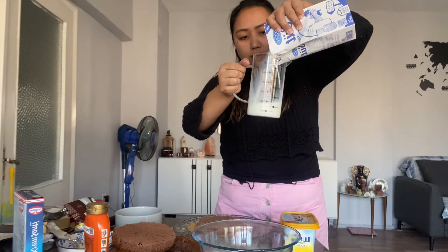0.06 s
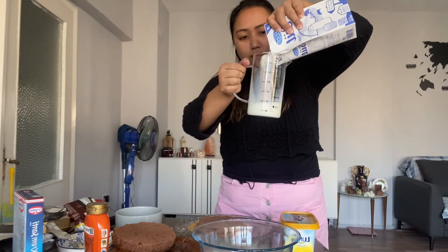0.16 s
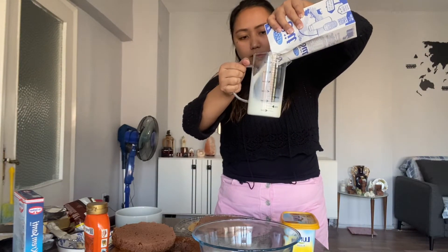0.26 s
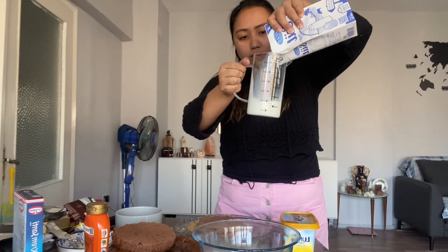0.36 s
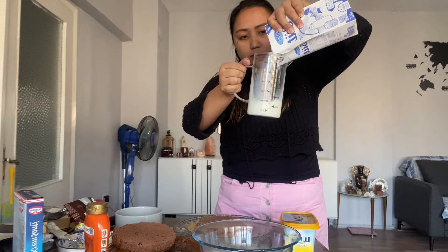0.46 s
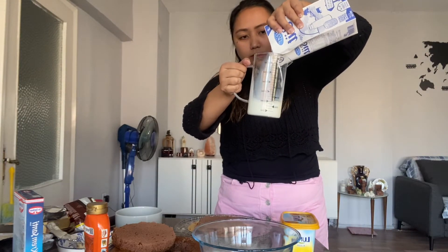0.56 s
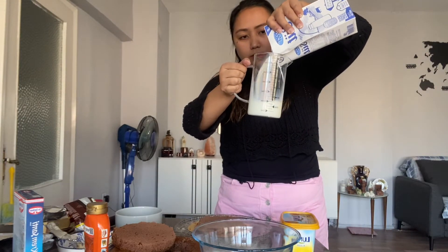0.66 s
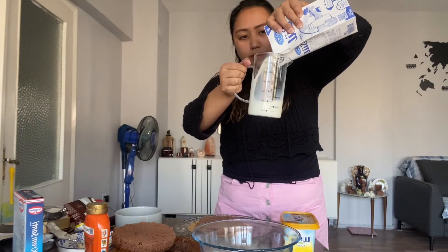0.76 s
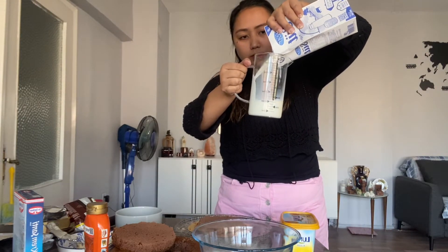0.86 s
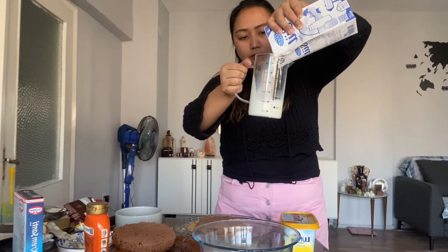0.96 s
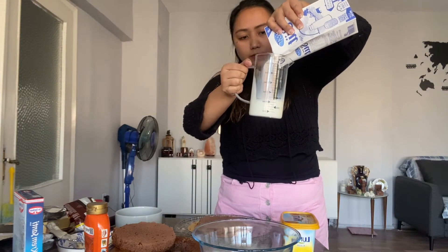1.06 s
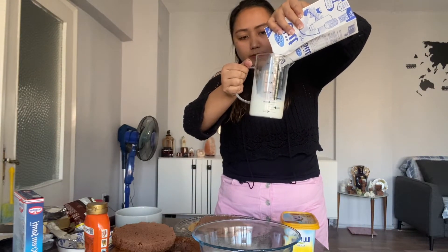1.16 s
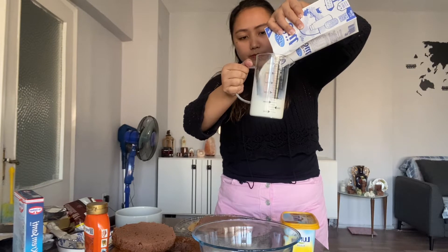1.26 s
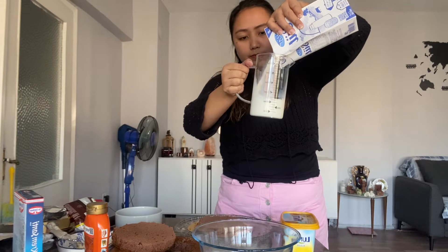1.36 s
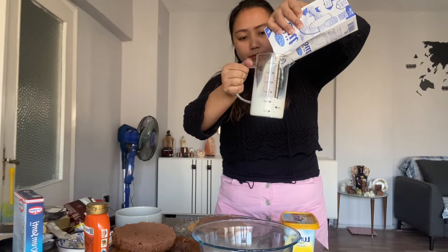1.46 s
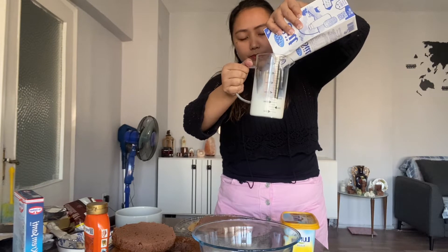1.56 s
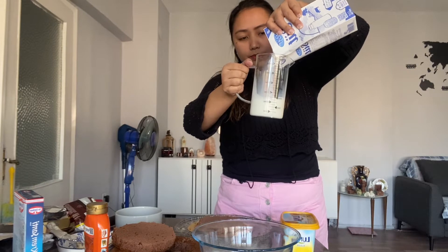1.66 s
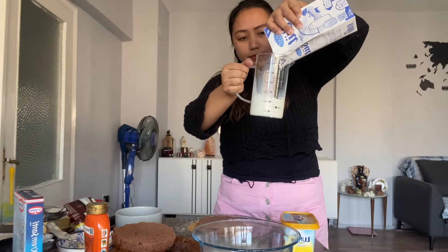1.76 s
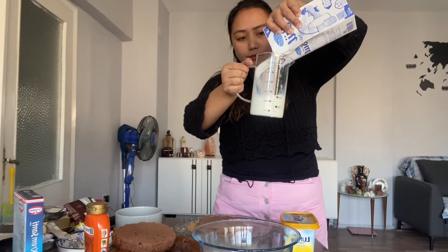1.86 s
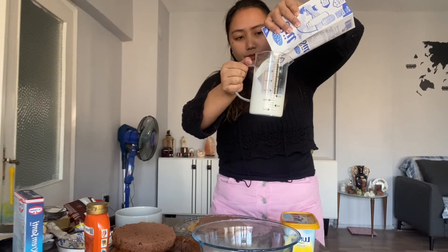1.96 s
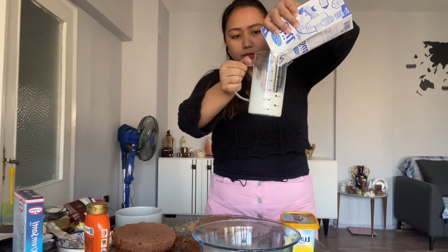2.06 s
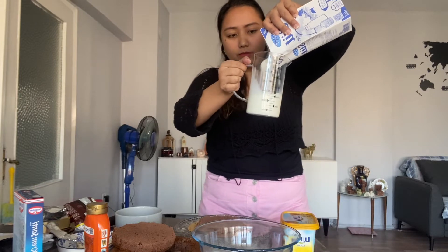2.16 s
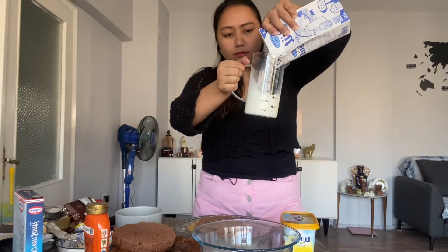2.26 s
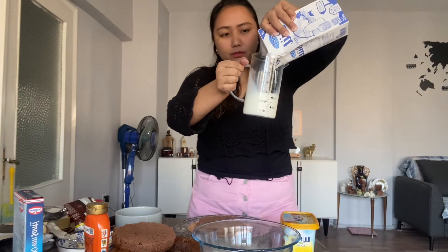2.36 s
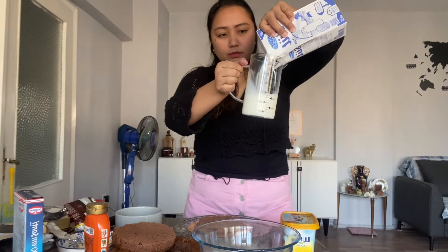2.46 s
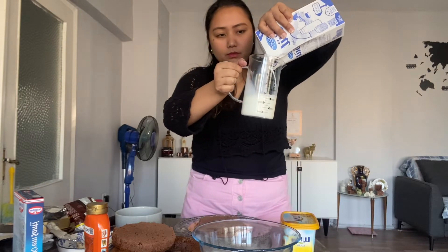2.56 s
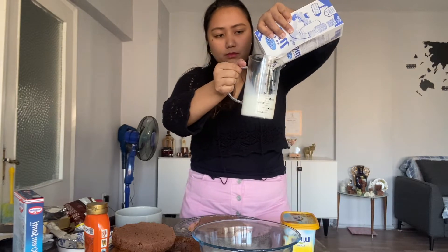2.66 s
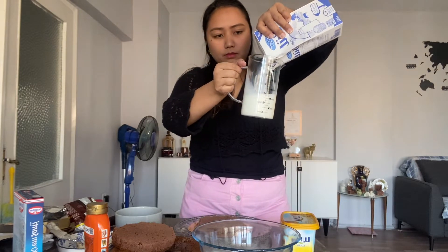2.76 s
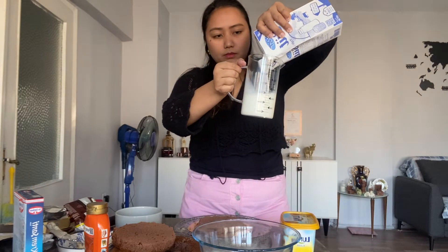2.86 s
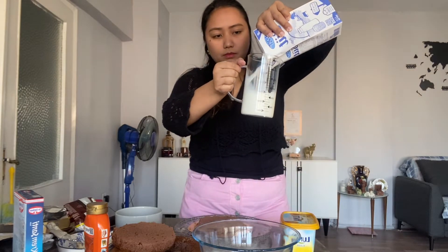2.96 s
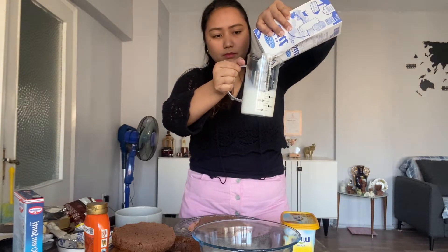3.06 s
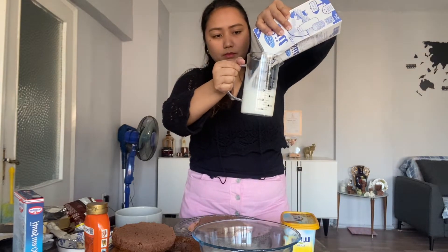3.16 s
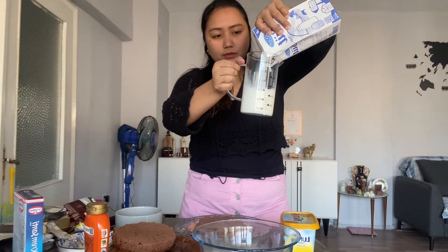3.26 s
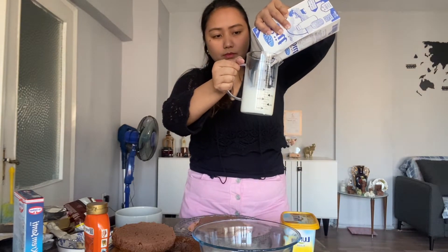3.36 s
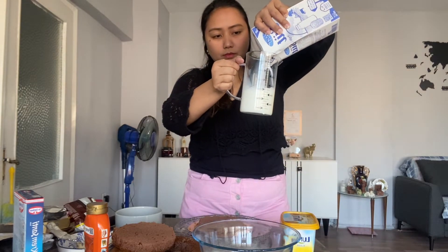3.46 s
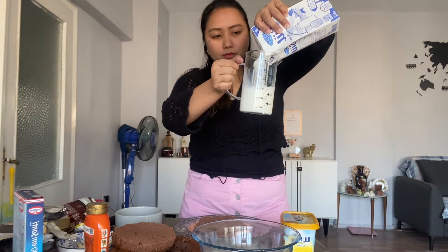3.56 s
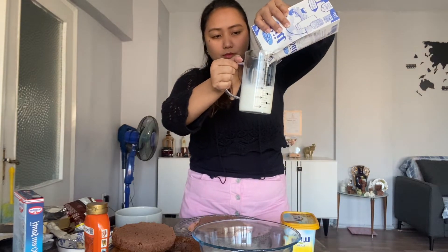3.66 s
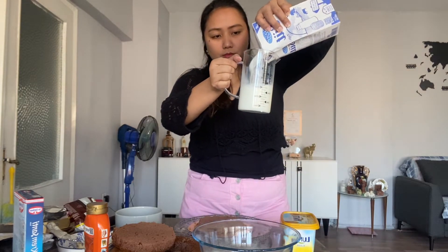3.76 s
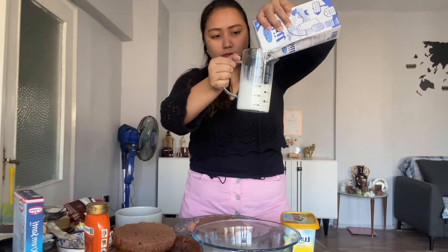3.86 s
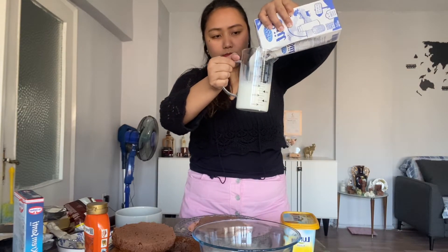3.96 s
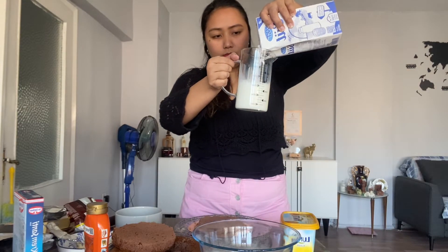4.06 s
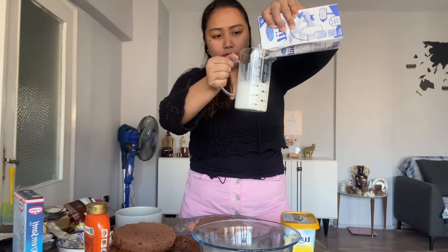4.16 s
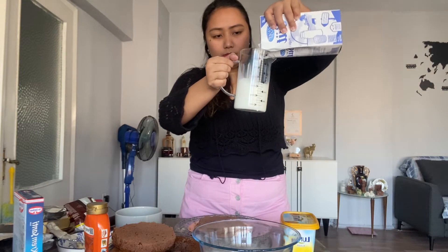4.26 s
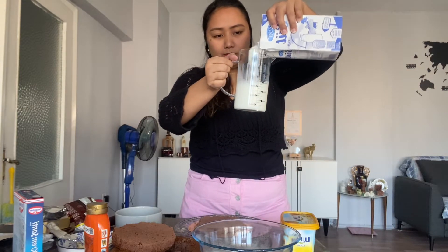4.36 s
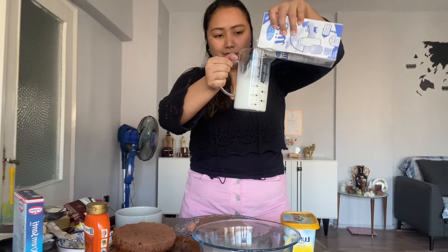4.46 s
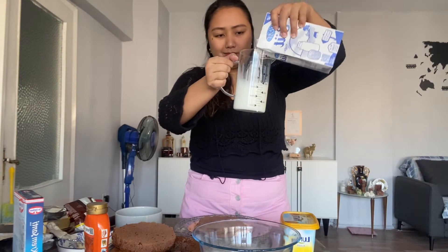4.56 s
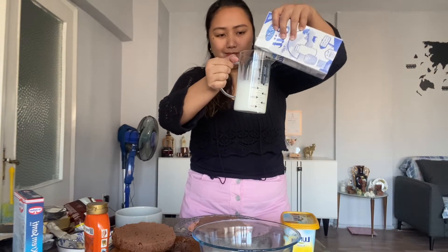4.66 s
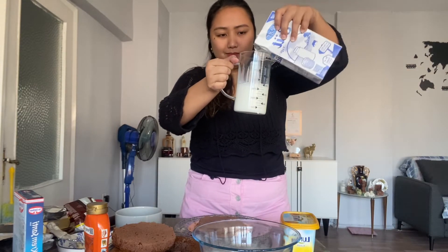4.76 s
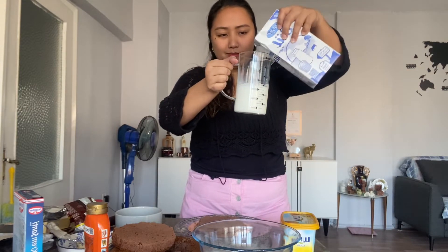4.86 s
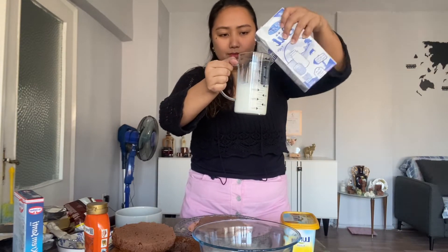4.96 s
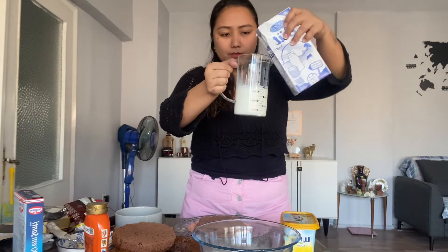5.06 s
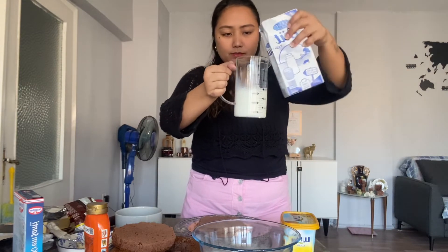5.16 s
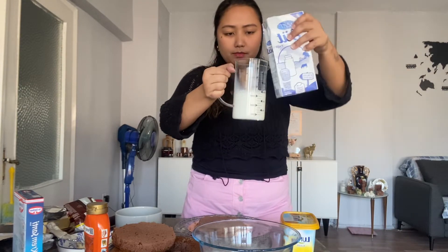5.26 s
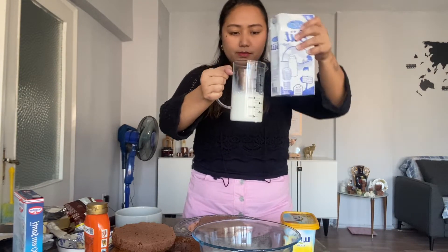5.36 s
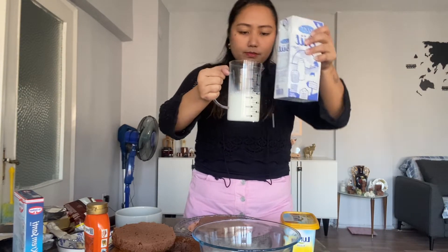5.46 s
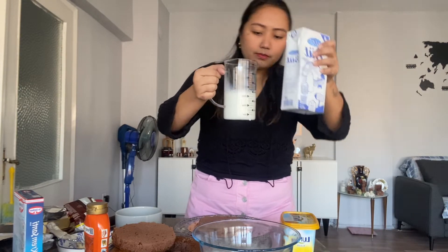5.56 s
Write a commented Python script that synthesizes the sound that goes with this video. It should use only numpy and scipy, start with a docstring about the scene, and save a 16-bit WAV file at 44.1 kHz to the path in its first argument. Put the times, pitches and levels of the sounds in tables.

```python
"""Milk is poured into a tall glass jug in a bare, lively room, with a short pause halfway.
Each gulp drives big bubbles, pitched swells that also set the air in the jug ringing; small bubbles plink.
The stream is a cloud of tiny ringing grains under a fizz of spray; slaps mix bubble clusters with noise bursts.
Drops fall back as blips, foam spits in narrow noise, the carton bumps softly, one last plop ends the pour.
Behind it lie hiss, a faint hum and a low rustle; scattered echoes and a diffuse tail make the room."""
import sys
import numpy as np
from scipy import signal
from scipy.fft import rfft, irfft
from scipy.io import wavfile
from scipy.ndimage import uniform_filter1d

SR = 44100
rng = np.random.default_rng(int(sys.argv[2]) if len(sys.argv) > 2 else 0)


def put_to_file(sound):
    """Save the sound as 16-bit audio at rate SR, in the file named by the first command-line argument."""
    columns = np.atleast_2d(sound).T  # one column per channel
    safe = np.clip(columns, -1, 1)
    whole_steps = np.round(safe * 32767)
    wavfile.write(sys.argv[1], SR, whole_steps.astype(np.int16))


N = 247842
TIME = np.arange(N) / SR


def from_db(db):
    """Decibels to gain."""
    return 10 ** (np.asarray(db) / 20)


def rms_one(x):
    """Scale to unit power."""
    return x / np.sqrt(np.mean(x ** 2) + 1e-20)


def in_time(rows):
    """Each column of a curve at every sample."""
    times, *columns = np.transpose(rows)
    return [np.interp(TIME, times, column) for column in columns]


def at_hz(points, hz):
    """Read a table on a log-frequency axis."""
    table_hz, values = np.transpose(points)
    return np.interp(np.log(hz + 1e-9), np.log(table_hz), values)


def add(out, s, sound):
    """Mix a sound in at time s."""
    room_left = out[max(round(s * SR), 0):][:len(sound)]
    room_left += sound[:len(room_left)]


def band(x, low_hz, high_hz):
    """Causal band-pass."""
    edges = [low_hz, min(high_hz, .45 * SR)]
    return signal.sosfilt(signal.butter(2, edges, "band", fs=SR, output="sos"), x)


def noise(spectrum):
    """Steady noise of a given colour, unit power."""
    hz = np.arange(N // 2 + 1) * SR / N
    return rms_one(irfft(rfft(rng.standard_normal(N)) * from_db(at_hz(spectrum, hz)), N))


def drift(rate_hz):
    """Smooth random wander of unit power, drawn every 40 samples and interpolated."""
    step = 40
    r = np.exp(-2 * np.pi * rate_hz * step / SR)
    white = rng.standard_normal(N // step + 2002)
    slow = signal.lfilter([1], [1, -2 * r, r * r], white)[2000:]  # drop the filter's run-in
    return np.interp(np.arange(N) / step, np.arange(len(slow)), rms_one(slow))


def slosh(x, rate_hz, sway_s, flutter_db):
    """The heaving surface bends the pitch and the strength of a ringing cavity."""
    bent = np.interp(TIME + sway_s * drift(rate_hz), TIME, x)
    return bent * from_db(flutter_db * drift(rate_hz))


def tone(hz, swell_s, t60, rise=0):
    """A cavity swells into ringing and dies away; its pitch climbs by the share `rise` per t60."""
    t = TIME[:int((swell_s + 1.5 * t60) * SR)]
    swell = np.sin(np.pi / 2 * np.minimum(t / swell_s, 1)) ** 2
    fade = from_db(-60 * np.maximum(t - swell_s, 0) / t60)
    return swell * fade * np.sin(2 * np.pi * hz * (t + rise * t * t / (2 * t60)))


def bubble_cloud(length, times, sizes, pitches, cycles, rise=0.006, swell_cycles=3):
    """Many tiny bubbles, each dying by 60 dB over some cycles while its pitch climbs."""
    out = np.zeros(length)
    for s, size, hz in zip(times, sizes, pitches):
        add(out, s, size * tone(hz, swell_cycles / hz, cycles / hz, rise))
    return out


def grains(spectrum, spread_db, cycles, count):
    """Bubbles are born at random with random sizes and pitches; their lumps of power are evened out."""
    when, size, pitch = rng.random((count, 3)).T
    lowest_hz, highest_hz = spectrum[0][0], spectrum[-1][0]
    pitches = lowest_hz * (highest_hz / lowest_hz) ** pitch
    extra_db = spread_db * np.minimum(-np.log(size), 3)
    # short, sparse high bubbles need more height for the same power per Hz
    sizes = pitches * from_db(at_hz(spectrum, pitches) + extra_db)
    cloud = bubble_cloud(N, when * TIME[-1], sizes, pitches, cycles)
    local_power = uniform_filter1d(rms_one(cloud) ** 2, size=2500)
    return rms_one(cloud / np.sqrt(local_power + 0.046))


# steady hiss of the room and the microphone: (frequency [Hz], relative density [dB per Hz])
HUSH_COLOUR = [(25, -4), (50, -1), (100, -4), (250, -5), (400, -9), (600, -15), (1000, -16.5),
               (2000, -21.5), (4000, -24.5), (8000, -24), (13000, -24.5), (15500, -31)]
# low rustle of arms and clothes: (time [s], level before trim and wander [dB])
RUSTLE_LEVEL = [(0.0, -64), (1.78, -73), (1.99, -70.5), (2.47, -75), (2.93, -67), (3.72, -63.5),
                (3.96, -76), (4.19, -73.5), (4.59, -65.5), (4.95, -71.5), (5.62, -86)]
# colour of that rustle: (frequency [Hz], relative density [dB per Hz])
RUSTLE_SPECTRUM = [(25, -16), (55, -2), (130, -3.5), (250, -8), (400, -9.5), (800, -56.5)]


def background(hush_db=-71.5, hum_hz=100, hum_db=-80.5, rustle_db=-0.5, patchy_db=5.0):
    """Steady hiss, a faint mains hum and the rustle of movement."""
    rustle_level = in_time(RUSTLE_LEVEL)[0] + rustle_db + patchy_db * drift(5.8)
    rustle = from_db(rustle_level) * noise(RUSTLE_SPECTRUM)
    hum = from_db(hum_db) * np.sin(2 * np.pi * hum_hz * TIME)
    return from_db(hush_db) * noise(HUSH_COLOUR) + rustle + hum


# the steady flow: (time [s], churn level before trim [dB], spray level before trim [dB])
FLOW_LEVELS = [(0.0, -67, -63), (0.15, -68.5, -64), (0.36, -68.5, -58.5), (0.5, -73, -65), (0.68, -91, -86),
               (0.83, -68, -47), (0.95, -65.5, -81), (1.3, -45, -61), (1.6, -54, -72), (1.9, -47, -53.5),
               (2.28, -49.5, -69), (2.45, -52.5, -73), (2.62, -66.5, -93), (2.87, -71.5, -63),
               (3.0, -45.5, -69), (3.23, -48.5, -77), (3.56, -62.5, -74), (3.85, -42.5, -68),
               (4.07, -48, -80), (4.38, -49.5, -58), (4.6, -49.5, -81), (4.85, -79, -77), (5.6, -95, -66.5)]
# colour of the churned bubbles: (frequency [Hz], relative density [dB per Hz])
CHURN_SPECTRUM = [(330, 11), (500, 2), (750, 14.5), (1100, 0), (1500, -5), (2100, -1.5), (2700, -9),
                  (3500, -5), (5000, -17.5), (7000, -21.5)]
# colour of the fine spray: (frequency [Hz], relative density [dB per Hz])
SPRAY_SPECTRUM = [(3000, -61), (4500, 5), (6000, 0), (8200, 19), (10000, -0.5), (13000, 15.5),
                  (16000, -23.5)]
# the flare-up after a slap takes this long to fall 60 dB
CHURN_WAKE_T60_S, SPRAY_WAKE_T60_S = 0.24, 0.39


def stream(churn_db=-11, spray_db=-17, churn_wake_db=-12, spray_wake_db=-15, mist_db=-6, surge_db=1.0):
    """Falling milk churns up bubbles, spray and mist, which surge together and flare after each slap."""
    churn_flow_db, spray_flow_db = in_time(FLOW_LEVELS)
    # powers, so that flow and wakes add up
    churn = from_db(churn_flow_db + churn_db) ** 2
    spray = from_db(spray_flow_db + spray_db) ** 2
    t = TIME[:SR]
    for s, _, body_db, _, high_db in SLAP_HITS:
        add(churn, s, from_db(body_db + churn_wake_db - 60 * t / CHURN_WAKE_T60_S) ** 2)
        add(spray, s, from_db(high_db + spray_wake_db - 60 * t / SPRAY_WAKE_T60_S) ** 2)
    low = grains(CHURN_SPECTRUM, spread_db=3.5, cycles=36, count=5000)
    high = grains(SPRAY_SPECTRUM, spread_db=6.5, cycles=40, count=2500)
    high = high + from_db(mist_db) * noise(SPRAY_SPECTRUM)
    return (np.sqrt(churn) * low + np.sqrt(spray) * high) * from_db(surge_db * drift(37))


# higher resonances of the air in the jug: (frequency [Hz], peak gain re the direct splash [dB])
JUG_RESONANCES = [(1087, -8), (1188, -12), (1643, -6), (1729, 2), (1918, 7.5), (2032, 2), (2272, 4.5),
                  (2453, 2), (3000, 11)]


def in_the_jug(x, t60=0.38):
    """A splash is heard directly and through the jug's narrow resonances, which waver with the surface."""
    rings = np.zeros(N)
    r = from_db(-60 / (t60 * SR))  # decay per sample
    for hz, db in JUG_RESONANCES:
        zeros = (1 - r * r) / 2 * np.array([1, 0, -1])
        poles = [1, -2 * r * np.cos(2 * np.pi * hz / SR), r * r]
        rings += from_db(db) * signal.lfilter(zeros, poles, x)
    return x + slosh(rings, rate_hz=24, sway_s=.00009, flutter_db=2)


# how long the room's tail rings: (frequency [Hz], t60 [s])
ROOM_DECAY = [(150, 0.54), (350, 0.39), (550, 0.55), (1200, 0.31), (3000, 0.39), (7500, 0.39),
              (14000, 0.21)]


def room(x, early_db=-12, early_t60=0.054, tail_db=-7.0):
    """Scattered echoes off table and body come first, then a diffuse tail, shortest in the top treble."""
    t = TIME[:int(.8 * SR)]
    white = rng.standard_normal((3, len(t)))
    edges, tail = np.geomspace(80, 18000, 12), 0
    for k, (low, high) in enumerate(zip(edges, edges[1:])):
        t60 = at_hz(ROOM_DECAY, np.sqrt(low * high))
        tail = tail + band(white[k % 2], low, high) * from_db(-60 * t / t60)
    tail = tail * np.clip((t - .005) / 0.00078, 0, 1)
    reflections = rng.random(len(t)) < 900 / SR  # about 900 a second
    early = white[2] * reflections * (t > .002) * from_db(-60 * t / early_t60)
    response = from_db(early_db) * rms_one(early) + from_db(tail_db) * rms_one(tail)
    return signal.fftconvolve(x, response / np.sqrt(len(t)))[:N]


# the stream and its stray drops slap the surface:
# (time [s], then the level before trim [dB] in each of four bands, low to high)
SLAP_HITS = [(0.024, -83, -61.5, -76, -75), (0.104, -65.5, -66, -67, -57), (0.176, -59.5, -60, -54, -58),
             (0.198, -89, -66.5, -68, -59.5), (0.25, -61, -62, -65.5, -82), (0.284, -64.5, -66, -67, -67),
             (0.386, -46.5, -48.5, -58, -54), (.41, -46, -47.5, -48, -60), (0.471, -49, -47, -50.5, -49),
             (0.698, -83, -72, -55.5, -80), (0.739, -61.5, -57, -61, -77),
             (0.774, -62.5, -53.5, -51.5, -64), (0.812, -71.5, -47, -53, -57.5),
             (0.977, -49.5, -50, -53, -60.5), (1.039, -79, -58.5, -60, -67), (1.087, -79, -62.5, -70, -73),
             (1.111, -53.5, -52.5, -70, -63.5), (1.16, -48, -55, -77, -81), (1.22, -52.5, -55, -55, -61.5),
             (1.262, -56.5, -51.5, -53.5, -70), (1.306, -47, -60.5, -51, -54), (1.339, -57, -65, -69, -59),
             (1.349, -55, -53, -59, -55), (1.388, -52, -48, -51, -58), (1.448, -68, -50.5, -52, -61.5),
             (1.483, -78, -50.5, -57.5, -63), (1.512, -72, -60, -61, -71),
             (1.631, -56.5, -53.5, -52, -56.5), (1.726, -61.5, -50, -54, -64), (1.729, -53, -57, -61, -66),
             (1.814, -61, -47.5, -56, -88), (1.826, -54, -59, -57, -68), (1.857, -68, -63, -56, -67),
             (1.889, -57, -55, -54, -66), (1.938, -80, -63, -61, -57.5), (1.954, -50, -55, -61, -57.5),
             (2.027, -57, -52, -63, -62.5), (2.06, -70, -61, -65, -70), (2.108, -52.5, -56, -55, -53.5),
             (2.225, -66, -52, -57, -57.5), (2.259, -52, -61, -59, -60), (2.323, -50.5, -48, -62.5, -92),
             (2.383, -69, -49.5, -61, -59.5), (2.414, -57, -61, -63, -60), (2.461, -68, -60, -70, -77),
             (2.535, -62, -63.5, -67, -92), (2.805, -78, -73, -67.5, -62.5), (2.901, -61, -54, -56.5, -61),
             (2.96, -56.5, -60.5, -62, -65), (3.099, -45, -42.5, -61, -68), (3.15, -53.5, -56, -60, -84),
             (3.2, -50, -67, -61.5, -63), (3.293, -48.5, -59, -54, -49.5), (3.332, -56.5, -56, -56, -64),
             (3.375, -63, -55, -58.5, -76), (3.447, -65, -61, -64, -69.5), (3.544, -74, -63, -69, -68),
             (3.603, -55.5, -70.5, -72, -68), (3.678, -57.5, -66.5, -70, -85),
             (3.714, -72.5, -57.5, -84, -70), (3.745, -45.5, -50.5, -60, -67), (3.769, -68, -65, -60, -85),
             (3.841, -76, -69, -70, -69), (3.885, -57, -57.5, -69, -84), (3.911, -74, -77, -62, -60.5),
             (3.945, -49, -67.5, -60.5, -58.5), (3.967, -73, -77, -60, -76), (4.033, -70, -74, -82, -84),
             (4.12, -56.5, -62, -52, -70), (4.139, -70, -69, -57.5, -78), (4.185, -75, -62, -60.5, -83),
             (4.151, -60, -55, -56.5, -69), (4.227, -75, -56.5, -64.5, -92), (4.296, -52, -53, -54.5, -70),
             (4.324, -56, -59, -63, -71), (4.386, -79, -82, -71, -64), (4.441, -64, -63, -58.5, -66),
             (4.487, -81, -62.5, -61, -73), (4.554, -58.5, -61, -62, -61.5), (4.567, -69, -55, -61, -79),
             (4.726, -59, -64, -57, -66), (4.784, -64.5, -84, -79, -69.5)]
# edges of those four bands: (frequency [Hz])
SLAP_BAND_EDGES = [900, 1700, 3000, 5500, 10000]
SPATTER_DB = -8  # noise re the bubbles of a slap
SLAP_CYCLES = 42  # cycles for a slap's bubble to fall 60 dB
SLAP_BODY_S = .02  # a slap's level is set over this opening stretch
STAGGER_S = .004  # the bands of a slap start up to this far apart


def slaps(level_db=-2.5, hold_s=.012, t60=0.15, scatter_s=0.010, clump_db=4):
    """A lumpy noise burst sounds with a cluster of quickly damped bubbles, each band at its own moment."""
    out, t, count = np.zeros(N), TIME[:SR // 10], 10
    fade = np.minimum(t / 0.0016, 1) * from_db(-60 * np.maximum(t - hold_s, 0) / t60)
    for k, (low, high) in enumerate(zip(SLAP_BAND_EDGES, SLAP_BAND_EDGES[1:])):
        hiss = band(band(rng.standard_normal(N), low, high), low, high)
        spatter = hiss * from_db(clump_db * drift(110))
        for s, *levels in SLAP_HITS:
            when, pitch = rng.random((2, count))
            # earlier bubbles are larger
            delays = np.minimum(-scatter_s * np.log(when), t[-1] / 2)
            sizes, pitches = np.sqrt(when), low * (high / low) ** pitch
            cluster = bubble_cloud(len(t), delays, sizes, pitches, SLAP_CYCLES, rise=.018, swell_cycles=6)
            noise_burst = rms_one(fade * spatter[int(s * SR):][:len(t)])
            part = rms_one(cluster) + from_db(SPATTER_DB) * noise_burst
            body_rms = np.sqrt(np.mean(part[:int(SLAP_BODY_S * SR)] ** 2))
            start = s + STAGGER_S * (rng.random() - .5)
            add(out, start, from_db(levels[k] + level_db) * part / body_rms)
    return out


def droplets(follow_db=-4, cycles=44, fall_s=.035, spread_db=3):
    """Drops thrown up by each slap fall back as short, ringing blips, the later ones softer on average."""
    out, count = np.zeros(N), 2
    for s, *levels in SLAP_HITS:
        for db, low, high in zip(levels, SLAP_BAND_EDGES, SLAP_BAND_EDGES[1:]):
            for when, size, pitch in rng.random((count, 3)):
                hz = low * (high / low) ** pitch
                gain = from_db(db + follow_db + spread_db * 2 * (size - when))
                blip = tone(hz, swell_s=0.0005, t60=cycles / hz, rise=.02)
                add(out, s + 2 * fall_s * when, gain * blip)  # fall_s is the mean delay
    return out


# the clearest small bubbles: (time [s], level [dB], starting pitch [Hz])
PLINK_BUBBLES = [(0.026, -48, 3150), (.104, -49.5, 2950), (.155, -48.5, 2380), (0.177, -46.5, 1356),
                 (0.256, -63, 2000), (0.193, -40, 1688), (0.292, -45, 2900), (0.37, -28.5, 1728),
                 (0.377, -35, 1635), (.407, -35.5, 2270), (.471, -32, 1723), (0.47, -34.5, 1198),
                 (0.542, -40, 1670), (0.702, -40.5, 3710), (.741, -47, 2460), (0.796, -46.5, 3090),
                 (1.088, -40.5, 2360), (1.165, -49, 2060), (1.345, -41, 1400), (1.724, -45, 1080),
                 (1.96, -51.5, 1192), (0.814, -40.5, 1694), (1.128, -31.5, 3296), (1.129, -45, 4100),
                 (1.371, -38.5, 1700), (1.483, -37, 2376), (1.587, -45.5, 2310), (1.735, -31.5, 3300),
                 (1.814, -41, 3420), (1.814, -43, 2420), (1.828, -36.5, 4500), (1.828, -38, 1035),
                 (2.036, -50, 3060), (2.23, -38, 1904), (2.262, -48, 1940), (2.39, -52, 2800),
                 (2.53, -54.5, 932), (2.327, -36, 1233), (2.874, -43, 3680), (2.899, -38, 3080),
                 (3.099, -45, 2400), (3.104, -39, 3030), (3.151, -37.5, 1250), (3.209, -43.5, 2260),
                 (3.296, -37.5, 1934), (3.148, -45.5, 4630), (3.334, -48, 3190), (3.333, -50.5, 1365),
                 (3.678, -46.5, 1140), (3.676, -49.5, 4140), (3.795, -39, 1085), (3.885, -46.5, 1020),
                 (3.886, -47, 1415), (3.914, -44, 2210), (4.037, -43, 2210), (4.121, -47, 4270),
                 (4.151, -42, 2230), (4.527, -49, 2100), (4.564, -45, 1436), (4.585, -47.5, 2320),
                 (4.725, -42, 2445), (4.768, -50.5, 2435), (4.943, -60.5, 3730)]
PLINK_CYCLES = 52  # cycles for a small bubble to fall 60 dB


def plinks(daughter_db=-8, scatter_octaves=0.36, lag_s=.014, daughter_cycles=20):
    """Small bubbles start fast and rise in pitch; each sheds a few daughters of about its own size."""
    out, count = np.zeros(N), 6
    for s, db, hz in PLINK_BUBBLES:
        add(out, s, from_db(db) * tone(hz, swell_s=0.0029, t60=PLINK_CYCLES / hz, rise=0.048))
        for when, pitch in rng.random((count, 2)):
            own_hz = hz * 2 ** (scatter_octaves * (2 * pitch - 1))
            daughter = tone(own_hz, swell_s=0.00043, t60=daughter_cycles / own_hz, rise=0.022)
            add(out, s + lag_s * when, from_db(db + daughter_db) * daughter)
    return out


# patches of foam burst: (time [s], level before trim and wander [dB], centre pitch [Hz])
FOAM_POPS = [(0.089, -57, 13100), (.128, -59, 12500), (.208, -63, 12400), (.42, -55, 13300),
             (.78, -56, 12900), (.812, -53.5, 13000), (0.813, -47, 8000), (0.977, -56, 12800),
             (1.035, -51.5, 11400), (1.115, -59, 13100), (1.22, -50.5, 12600), (1.264, -59, 12800),
             (1.308, -60, 12400), (1.385, -61, 12600), (1.436, -56, 12100), (1.487, -63, 12800),
             (1.568, -52, 7760), (1.728, -59, 12800), (1.863, -55, 12100), (2.11, -69, 12400),
             (2.383, -58, 13100), (2.41, -71, 12900), (2.607, -60, 12900), (2.769, -62, 13500),
             (2.842, -55, 12800), (2.901, -53, 7140), (2.96, -61, 12900), (2.985, -52.5, 7100),
             (3.022, -56, 7100), (3.089, -52, 8240), (3.199, -61, 12100), (3.293, -64, 12600),
             (3.603, -58, 12100), (3.994, -50, 13200), (4.12, -57, 7400), (4.385, -69, 12900),
             (4.438, -61, 12800)]


def pops(level_db=-5, t60=0.17, width_octaves=0.14, clump_db=5.0):
    """A patch of foam bursts with a short, uneven spit of narrow noise."""
    out, t = np.zeros(N), TIME[:SR // 10]
    for s, db, hz in FOAM_POPS:
        spit = band(rng.standard_normal(len(t)), hz / 2 ** width_octaves, hz * 2 ** width_octaves)
        add(out, s, from_db(db + level_db - 60 * t / t60) * rms_one(spit))
    return out * rms_one(from_db(clump_db * drift(280)))


# the big bubbles, one or two to a gulp:
# (time [s], level [dB], starting pitch [Hz], t60 [s], jug ring re the bubble before coupling [dB])
BIG_BUBBLES = [(0.389, -19.5, 530, 0.039, -26), (.421, -44.5, 523, 0.053, -19.5),
               (.494, -66, 570, 0.19, -16), (.521, -39.5, 791, 0.08, -42), (.980, -25.5, 567, 0.11, -6),
               (1.045, -38.5, 568, 0.056, -14), (1.163, -37, 590, 0.066, -5.5),
               (1.217, -32, 517, 0.095, -3.5), (1.263, -19, 496, 0.0044, -20.5),
               (1.266, -32.5, 799, 0.084, -27), (1.326, -39.5, 480.4, 0.16, -1.5),
               (1.441, -40.5, 560, 0.054, -4), (1.452, -35.5, 392, 0.054, -30), (1.659, -35, 582, 0.071, 4),
               (1.725, -41.5, 557, 0.02, 8), (1.831, -42, 697, 0.16, 5), (1.912, -33, 579, 0.093, -17),
               (2.032, -30.5, 566, 0.042, -3.5), (2.112, -35.5, 528, 0.046, -15),
               (2.175, -47.5, 600, .04, -28), (2.278, -44.5, 589, 0.056, -7),
               (2.369, -31.5, 592, 0.11, -29), (2.388, -35, 687, 0.094, -23),
               (2.445, -44.5, 643, 0.081, -28), (2.96, -48, 711, 0.061, -3.5),
               (3.109, -26, 670, 0.0097, -7.5), (3.175, -34.5, 622.6, 0.32, -30),
               (3.290, -29.5, 530, 0.01, -9), (3.303, -32.5, 687, 0.012, -28),
               (3.342, -32, 608.4, 0.19, -10.5), (3.359, -41, 400, 0.15, -31),
               (3.400, -39, 824, 0.06, -22.5), (3.412, -38.5, 627, 0.036, -17.5),
               (3.608, -42.5, 608, 0.15, -24), (3.751, -28, 609.5, 0.039, -8),
               (3.946, -22, 590, 0.015, -13), (3.957, -28, 714, 0.041, -18), (3.961, -30, 546, 0.032, -4),
               (3.978, -39.5, 516.3, 0.6, -5), (4.023, -35.5, 596, 0.0049, -2),
               (4.155, -25.5, 566, 0.014, -14.5), (4.297, -39.5, 723, 0.087, -4.5),
               (4.337, -35.5, 696, 0.045, -9), (4.562, -35, 572, 0.013, -17.5),
               (4.577, -42, 660, 0.035, -9.5), (4.757, -41, 538, 0.029, -36)]
# note of the air column, which shortens as the jug fills: (time [s], starting pitch [Hz])
AIR_COLUMN = [(0, 581), (1, 603), (2.1, 565.7), (3.1, 608.8), (4.6, 649)]
# resonances that stay put while the jug fills: (frequency [Hz], level re the air column [dB])
FIXED_MODES = [(528, -18), (700, -21), (792, -27.5)]
JUG_T60_S = 0.53
GLUG_SWELL_S = 0.007195  # a big bubble takes this long to pinch off


def glugs(coupling_db=-2.0, air_rise=0.008, lowest_hz=300,
          shed_db=-17, shed_s=.15, shed_t60=0.042, shed_octaves=0.14, shed_fade_db=9,
          gulp_hz=790, gulp_db=-19, gulp_t60=0.1):
    """Big bubbles ring, shed lesser ones and excite the jug's air, wavering as the milk heaves."""
    bubbles, air, count = np.zeros(N), np.zeros(N), 7
    beside = sum(from_db(db) * tone(hz, swell_s=0.0045, t60=JUG_T60_S) for hz, db in FIXED_MODES)
    for s, db, hz, t60, jug_db in BIG_BUBBLES:
        add(bubbles, s, from_db(db) * tone(hz, GLUG_SWELL_S, t60, rise=0.032))
        add(bubbles, s, from_db(db + gulp_db) * tone(gulp_hz, GLUG_SWELL_S, gulp_t60))
        air_hz = np.interp(s, *np.transpose(AIR_COLUMN))
        column = tone(air_hz, swell_s=0.0022, t60=JUG_T60_S, rise=air_rise)
        ringing = from_db(db + jug_db + coupling_db)
        add(air, s + GLUG_SWELL_S, ringing * column)
        add(air, s + GLUG_SWELL_S, ringing * beside)
        for when, pitch in rng.random((count, 2)):
            own_hz = hz * 2 ** (shed_octaves * (2 * pitch - 1))
            gain = from_db(db + shed_db - shed_fade_db * when)
            add(bubbles, s + shed_s * when, gain * tone(own_hz, GLUG_SWELL_S, shed_t60, rise=0.028))
    out = slosh(bubbles, rate_hz=25, sway_s=.00005, flutter_db=.5)
    out = out + slosh(air, rate_hz=24, sway_s=.00014, flutter_db=2.2)
    # the narrow jug radiates little below its own note
    return signal.sosfilt(signal.butter(2, lowest_hz, "high", fs=SR, output="sos"), out)


# soft bumps of the carton: (time [s], level [dB], pitch [Hz], t60 [s])
CARTON_BUMPS = [(2.492, -44.5, 230, 0.025), (2.855, -52, 357, 0.12), (2.866, -49, 226, 0.048),
                (2.869, -49, 61, 0.12), (3.044, -43.5, 386, 0.061), (3.054, -47, 223, 0.12),
                (3.528, -33.5, 221, 0.031), (3.533, -52, 129, 0.067)]


def bumps(slop_db=-11, slop_t60=0.31):
    """The carton's walls flex with a dull knock, and the milk inside slops about."""
    out, t = np.zeros(N), TIME[:SR // 3]
    for s, db, hz, t60 in CARTON_BUMPS:
        add(out, s, from_db(db) * tone(hz, swell_s=0.0023, t60=t60))
        slop = rms_one(band(rng.standard_normal(len(t)), hz / 2, hz * 1.36))
        add(out, s, from_db(db + slop_db - 60 * t / slop_t60) * slop / 2)
    return out


def last_plop(start_s=4.768, level_db=-30, hz=389, t60=0.023):
    """As the pour stops, one gulp of air closes off in the carton's spout."""
    out = np.zeros(N)
    add(out, start_s, from_db(level_db) * tone(hz, swell_s=0.0058, t60=t60, rise=0.04))
    return out


def scene(glug_wet_db=-3, bump_wet_db=-4, splash_wet_db=0.0, plop_wet_db=-11):
    """The splashes leave the jug upwards and reach the microphone partly by way of the walls."""
    deep, knocks, plop = glugs(), bumps(), last_plop()
    bright = pops() + in_the_jug(plinks() + slaps() + droplets() + stream())
    to_room = from_db(glug_wet_db) * deep + from_db(bump_wet_db) * knocks
    to_room = to_room + from_db(splash_wet_db) * bright + from_db(plop_wet_db) * plop
    return (deep + knocks + plop + bright + room(to_room) + background())[None]


def record(dry, notch_hz=10450, notch_width_hz=1800, cutoff_hz=15600):
    """The whole sound has a dip near 10.4 kHz and little above 15.6 kHz."""
    coloured = signal.lfilter(*signal.iirnotch(notch_hz, notch_hz / notch_width_hz, fs=SR), dry)
    return signal.sosfilt(signal.ellip(10, .1, 70, cutoff_hz, fs=SR, output="sos"), coloured)


dry = scene()
out = record(dry)
put_to_file(out)
```